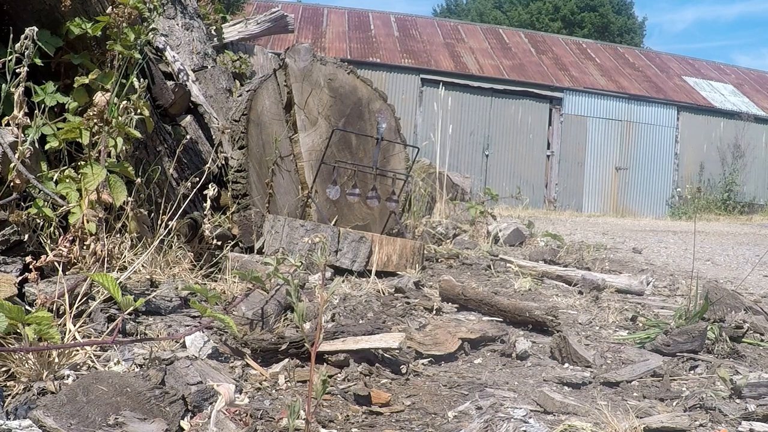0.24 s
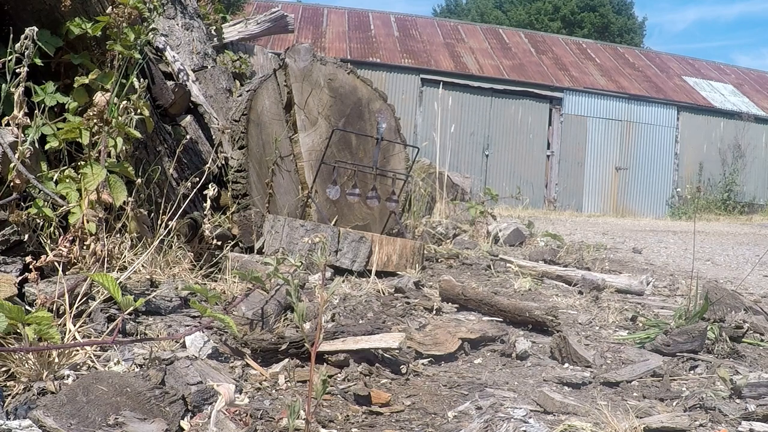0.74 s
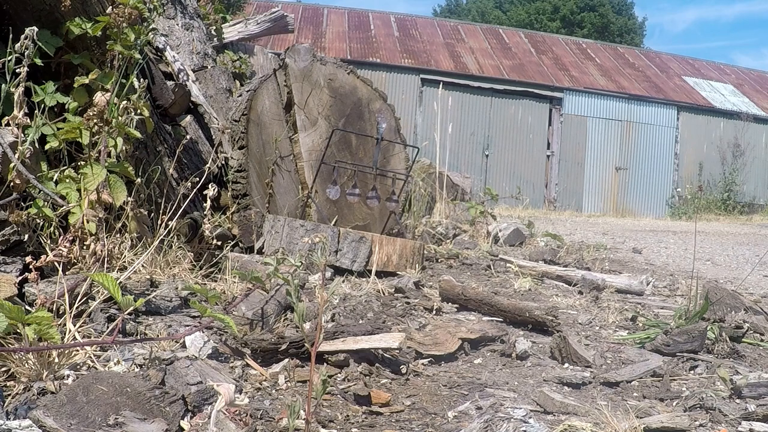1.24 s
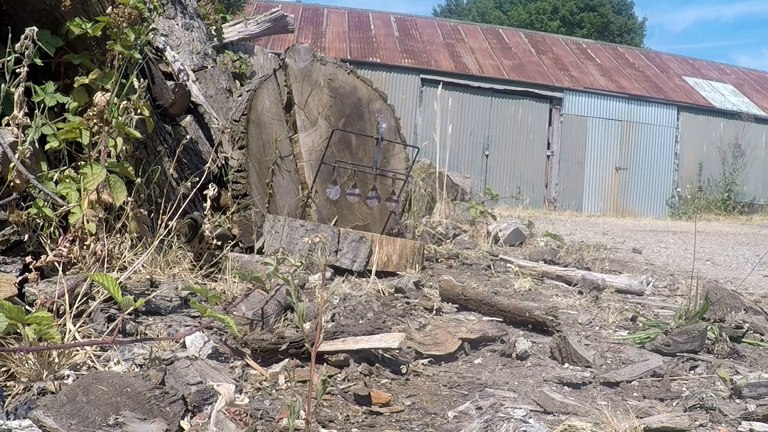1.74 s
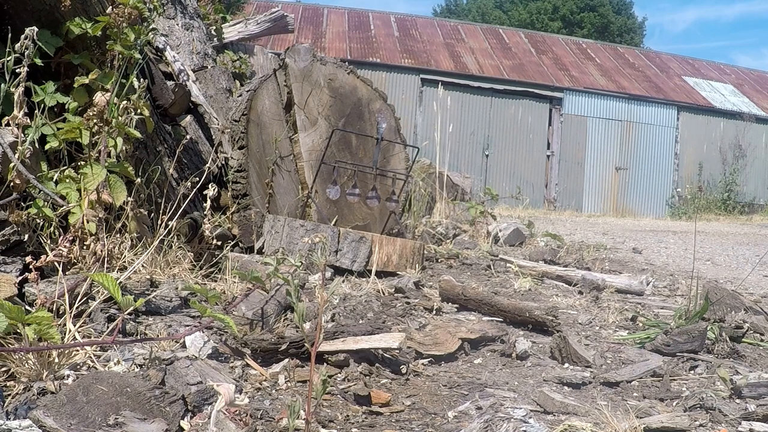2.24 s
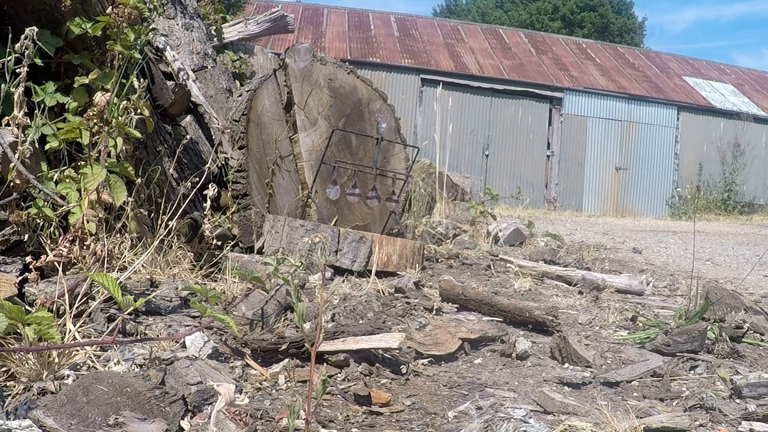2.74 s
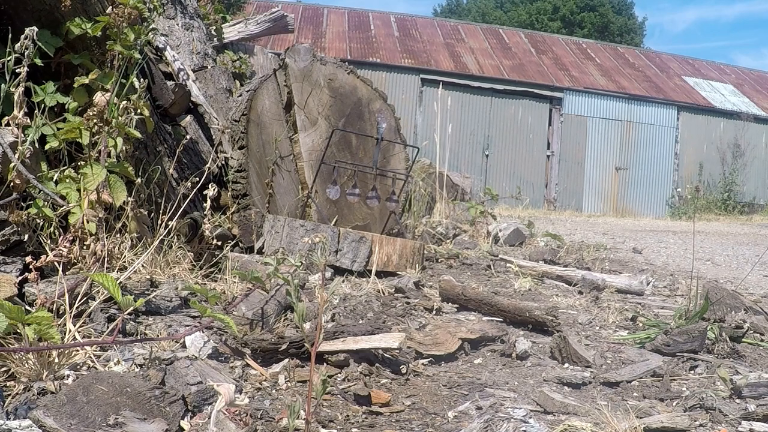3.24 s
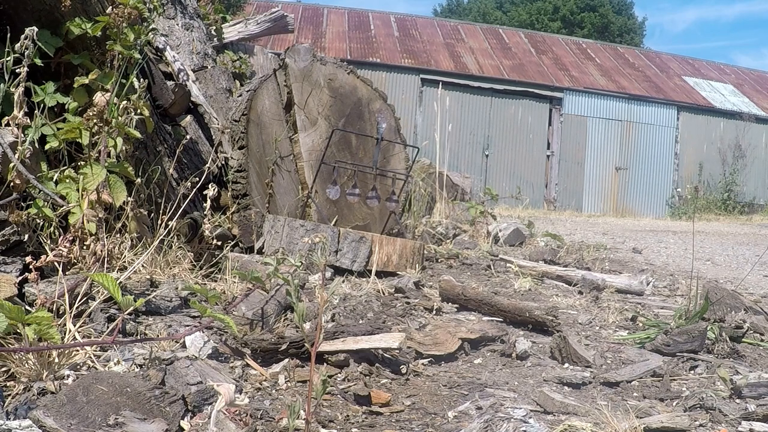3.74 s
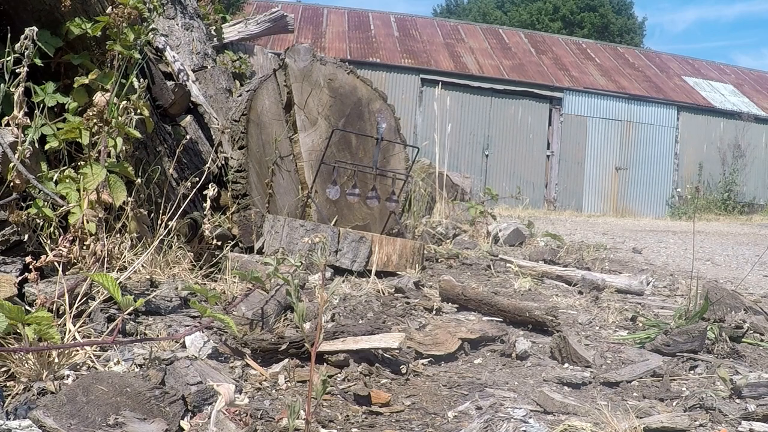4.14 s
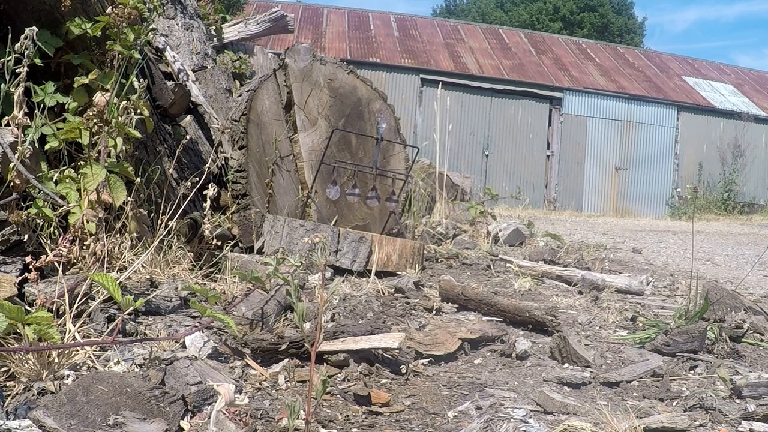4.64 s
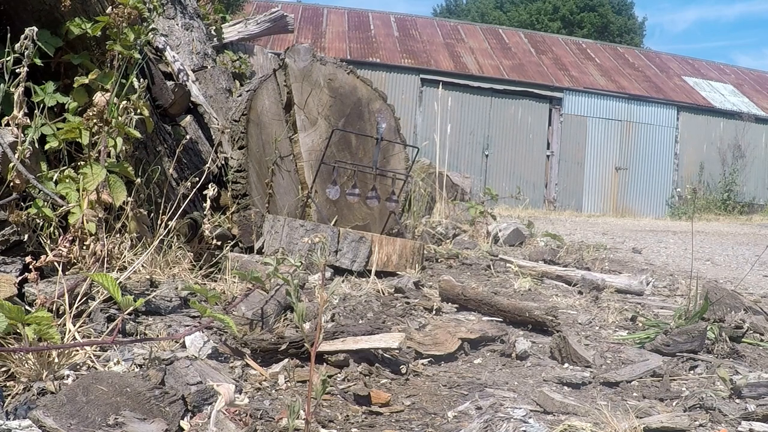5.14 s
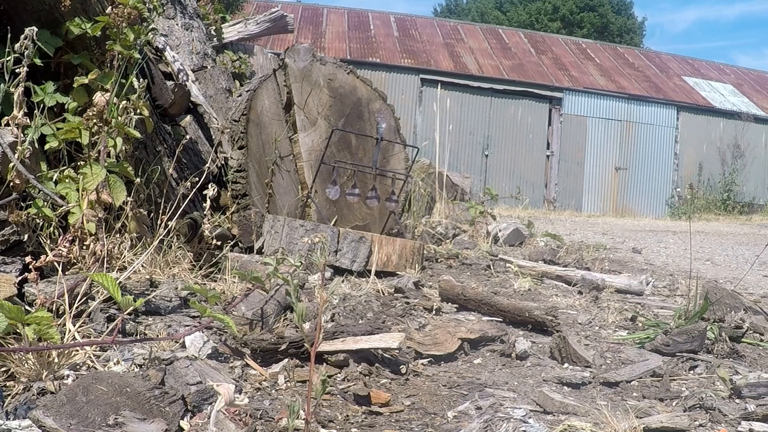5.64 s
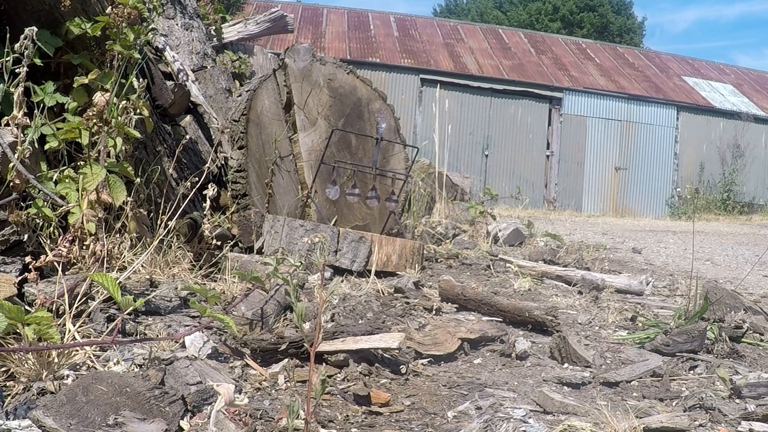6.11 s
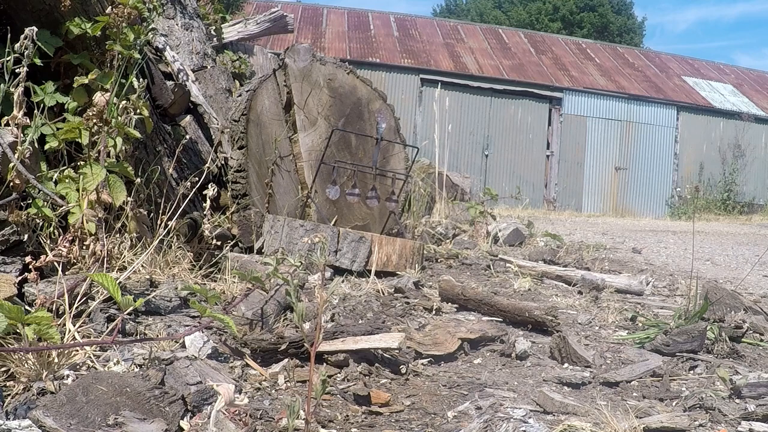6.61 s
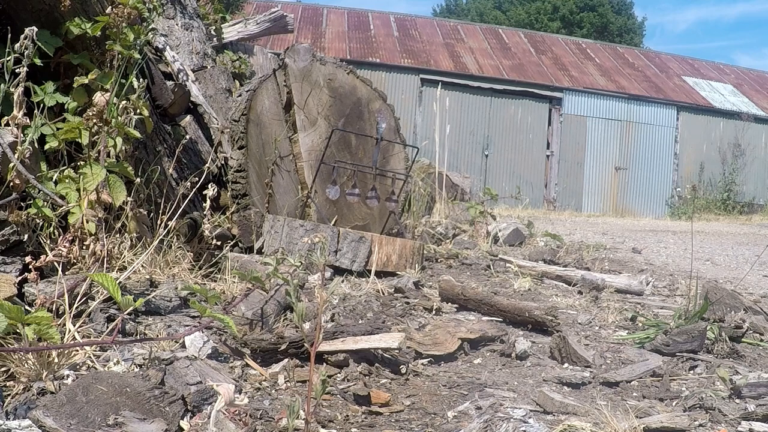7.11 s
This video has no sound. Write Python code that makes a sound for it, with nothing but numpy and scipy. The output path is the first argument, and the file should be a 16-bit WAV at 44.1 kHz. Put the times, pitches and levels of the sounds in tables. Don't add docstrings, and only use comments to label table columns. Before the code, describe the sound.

Outdoor farmyard with a wavering low aircraft drone, steady far machinery hum and faint hiss, then a click, pop and short metallic echo near the end.

```python
import sys
import numpy as np
from scipy import signal
from scipy.fft import rfft, irfft, next_fast_len
from scipy.io import wavfile
from scipy.ndimage import uniform_filter1d

SR = 44100
rng = np.random.default_rng(int(sys.argv[2]) if len(sys.argv) > 2 else 0)


def to_wav(sig):
    pcm = np.clip(np.atleast_2d(sig), -1, 1) * 32767
    pcm = np.round(pcm).astype(np.int16)
    wavfile.write(sys.argv[1], SR, pcm.T)


def elevation(decibels):
    levels = np.asarray(decibels, float)
    return 10 ** (levels / 20)


N = 325017
TIME = np.arange(N) / SR
BINS_HZ = np.fft.rfftfreq(N, 1 / SR)
SIDE = np.array([[1], [-1]])

# [f/Hz, level/(dB per Hz)]
AIR_DENSITY = [(8, -79), (45, -67.5), (160, -66.5), (300, -74.5), (420, -75.5), (560, -82), (1000, -81),
               (1350, -87), (1780, -90.5), (1950, -94.5), (2300, -97.5), (3200, -100), (4500, -108),
               (8000, -125)]
# [f/Hz, level/(dB per Hz)]
HISS_DENSITY = [(500, -105), (4600, -102), (5900, -99), (7850, -100), (7950, -103), (9000, -101),
                (10000, -102), (12500, -109), (15000, -118), (22000, -130)]
# [f/Hz, likeness/0-1, right lead/rad, left minus right/dB]
PORT_PAIR = [(20, .2, 0, -.8), (86, .88, 0, 1.4), (260, .76, .16, 2.6), (430, .33, .74, 1.0),
             (600, .15, 2.04, -.7), (800, .66, 2.76, -1.1), (1100, .56, 3.05, -2.8), (1500, .42, 3.7, -2.5),
             (2100, .3, 3.7, -.6), (2800, .12, 4.6, -.6), (3500, .65, 6.0, -1.5), (4400, .9, 6.25, -.2),
             (7500, .1, 6.3, -.3), (8600, .1, 6.3, -2.4)]
# [t/s, length/s, centre f/Hz, level/dB]
ROAR_GUSTS = [(2.0, 0.23, 300, 2), (2.96, 1, 300, 6.5), (4.2, 0.18, 200, 1), (4.6, 0.15, 300, -3),
              (5.3, 1, 130, -13), (5.873, 0.33, 280, 8), (5.95, 0.5, 420, 6.5), (6.3, 0.32, 220, 5),
              (1.75, .3, 140, 5), (7.3, .2, 140, 6), (6.213, 0.42, 298, 7.5), (6.522, 0.22, 400, 7),
              (7.043, 0.53, 300, 6), (2.806, 0.21, 1700, 6), (3.1, 0.33, 1800, 4), (3.6, 0.45, 815, 2),
              (4.103, 0.27, 1600, 8), (4.15, .4, 596, 7), (7.303, .2, 360, 5), (4.6, 0.36, 1660, 4),
              (5.905, 0.4, 1390, 6), (6.527, .28, 950, 8), (6.85, 0.47, 1650, 4.5), (7.3, 0.24, 1700, 5)]
GUST_OCTAVES, CALM_DB, NEARING_DB_PER_S = 0.68, -2.5, 0.2856
# [multiple of cycle rate, level/dB]
ENGINE_PARTIALS = [(2, -62), (5, -62), (6, -53), (8, -56), (9, -64), (11, -59), (12, -57.5), (15, -63),
                   (16, -55.5), (20, -61), (22, -62.5), (23, -66.5), (25, -71), (26, -70), (27, -65),
                   (28, -61.5), (29, -68), (31, -66.5)]
# [t/s, f/Hz]
ENGINE_RATE = [
    (0, 22.91),
    (2.5, 22.94),
    (4.5, 22.78),
    (7.37, 22.96),
]
# [f/Hz, level/dB]
MACHINE_HUMS = [
    (18.2, -54),
    (30.1, -51.5),
    (54.5, -60),
]
# [t/s, level/dB]
BREEZE_LEVEL = [
    (0, -10.5),
    (0.5, -1.5),
    (1.8, -4.5),
    (2.4, 1.5),
    (3.7, 0),
    (4.2, 3.5),
    (5.5, 1.5),
    (6.2, -1),
    (7.37, 0.5),
]
# [t/s, peak level/dB, left minus right/dB, centre f/Hz, t60/s]
SHOT_CRACKS = [(6.5974, -49, -3, 5800, .016), (6.599, -47, -1, 1900, 0.022),
               (6.6022, -48, -1.5, 6900, .026), (6.601, -46.5, -8, 5500, .035),
               (6.659, -40.5, 1, 6550, 0.0092), (6.6587, -41, -4, 2800, 0.01),
               (6.658, -53, -1, 9500, 0.007), (6.6757, -39.5, -16, 2450, 0.02),
               (6.6768, -42, 0, 4940, 0.018), (6.6835, -43, -4, 6000, 0.036),
               (6.6844, -53, -4, 4300, 0.017), (6.6945, -41.5, 3, 2320, 0.025),
               (6.698, -42, -3, 2480, 0.028), (6.7054, -47, -4, 3300, .03), (6.7102, -46, -3, 2300, .03),
               (6.717, -45, 1, 3100, 0.025)]
CRACK_T60_S, CRACK_WIDTH_HZ = 0.018, 1700
# [f/Hz, level/dB, t60/s]
PLATE_MODES = [
    (2440, -52.5, 0.25),
    (3410, -57.5, 0.25),
    (5300, -56, 0.2),
]
# [f/Hz, level/(dB per Hz)]
WALL_DENSITY = [(700, -52), (1500, -35), (2400, -34.5), (3600, -39), (4500, -46), (5800, -40.5),
                (7500, -47), (12000, -66)]
YARD_DB, YARD_T60_S = -46, 0.53
# [t/s, f/Hz]
BLADE_RATE = [
    (0, 95.6),
    (1.0, 94.4),
    (1.9, 92.8),
    (4.2, 90.6),
    (4.9, 90.4),
    (5.7, 88.7),
    (7.37, 87.2),
]
# [t/s, level/dB]
BLADE_LEVEL = [(0, -30), (0.6, -26), (1.0, -28), (1.38, -34), (1.6, -42.5), (1.78, -36.5), (1.88, -31),
               (2.6, -26.5), (3.1, -28), (3.6, -36.5), (3.87, -26), (4.65, -31), (4.96, -35), (5.06, -41),
               (5.66, -44), (5.8, -32.5), (6.15, -22.5), (7.37, -26.5)]
# [t/s, length/s, level/dB]
PATH_FADES = [(0.296, 0.17, -5.5), (0.892, 0.077, -3), (1.083, 0.087, -9), (1.27, .1, -4),
              (2.31, 0.13, -1.5), (2.85, 0.24, -7.5), (3.24, .1, -2), (3.692, .1, -9), (4.27, 0.1, -2),
              (4.788, .16, -10), (5.1, 0.056, -12), (5.303, .06, -7), (5.59, 0.082, -14), (6.622, 0.17, -5),
              (6.9, 0.058, -1.5), (7.043, .14, 2.5), (7.226, 0.15, -4.5)]
# [t/s, length/s, multiple, level/dB]
MULTIPLE_SWELLS = [(0.25, .35, 2, -54), (0.6, 0.25, 2, -42), (0.837, 0.25, 2, -43), (1.345, 0.26, 2, -37.5),
                   (1.705, 0.42, 2, -42), (2.195, 0.44, 2, -38), (2.662, 0.33, 2, -36),
                   (3.015, 0.41, 2, -35), (3.386, 0.15, 2, -45), (3.687, .08, 2, -42), (4.053, .2, 2, -40),
                   (4.4, 0.48, 2, -45), (5.2, 0.63, 2, -49), (5.74, .2, 2, -34.5), (5.96, .16, 2, -34.5),
                   (6.142, 0.13, 2, -34), (6.28, 0.041, 2, -33), (6.458, 0.2, 2, -36), (6.72, .08, 2, -39),
                   (7.1, 0.76, 2, -51), (0.681, 0.14, 3, -47.5), (1.348, 0.39, 3, -48), (2.6, 0.38, 3, -52),
                   (2.873, 0.26, 3, -47.5), (4.4, .7, 3, -56.5), (5.884, 0.19, 3, -42),
                   (6.123, 0.16, 3, -45), (6.447, 0.44, 3, -47), (7.073, 0.08, 3, -42.5),
                   (7.302, .2, 3, -46.5)]


def curve(table):
    rows = np.array(table, float)
    return np.interp(TIME, rows[:, 0], rows[:, 1])


def over_hz(table, column, hz):
    rows = np.array(table, float)
    return np.interp(np.log(np.maximum(hz, 1)), np.log(rows[:, 0]), rows[:, column])


def running_phase(rate_hz):
    return 2 * np.pi * np.cumsum(rate_hz) / SR


def walk(rate_hz):
    hold = int(SR / rate_hz)
    steps = np.repeat(rng.standard_normal(N // hold + 3), hold)
    smooth = uniform_filter1d(uniform_filter1d(steps, hold), hold)
    return 1.63 * smooth[hold:N + hold]


def bump(s, length_s, edge):
    return np.exp(-abs(2 * (TIME - s) / length_s) ** edge)


def decay(since_s, t60_s):
    return np.exp(-np.log(1000) * since_s / t60_s)


def coloured(density, channels):
    white = rfft(rng.standard_normal((channels, N)))
    return white * elevation(over_hz(density, 1, BINS_HZ)) * np.sqrt(SR / 2)


def ports(common, apart=None):
    margin = 4096
    size = next_fast_len(N + 2 * margin)
    pad = (margin, size - N - margin)
    hz = np.fft.rfftfreq(size, 1 / SR)
    like, lead_rad, balance_db = (over_hz(PORT_PAIR, column, hz) for column in range(1, 4))
    common = np.pad(common, pad, "reflect", reflect_type="odd")
    common = common * signal.windows.tukey(size, margin / size)
    pair = rfft(common) * np.exp(-.5j * lead_rad * SIDE)
    if apart is not None:
        alone = rfft(np.pad(apart, ((0, 0), pad), "reflect"))
        pair = np.sqrt(like) * pair + np.sqrt(1 - like) * alone
    return irfft(pair * elevation(balance_db * SIDE / 2), size)[:, margin:margin + N]


def gusts_db(hz):
    level_db = CALM_DB + NEARING_DB_PER_S * TIME
    for s, length_s, centre_hz, db in ROAR_GUSTS:
        reach = np.exp(-(np.log2(hz / centre_hz) / GUST_OCTAVES * 2) ** 2)
        if reach > .02:
            level_db = level_db + reach * db * bump(s, length_s, 1.16)
    return level_db


def outdoor_air():
    spectra, out, lumps = coloured(AIR_DENSITY, channels=3), 0, walk(40)
    lowest_hz = 9.1
    place = 2 * np.log2(np.maximum(BINS_HZ, 1) / lowest_hz)
    for k in range(20):
        hz = lowest_hz * 2 ** (k / 2)
        band = irfft(spectra * np.sqrt(np.clip(1 - abs(place - k), 0, 1)), N)
        reach = np.clip(min(hz / 60, 1700 / hz), 0, 1) ** 4
        gust_db = reach * gusts_db(hz)
        lump_db = 0.34 * np.maximum(gust_db, 0) * lumps
        out = out + band * elevation(gust_db + lump_db + 0.48 * walk(3.03) + 0.55 * walk(9))
    return ports(out[0], out[1:])


def engine():
    phase, breeze_db, out = running_phase(curve(ENGINE_RATE)), curve(BREEZE_LEVEL), 0
    for k, db in ENGINE_PARTIALS:
        share = np.interp(k, [6, 22], [0, 1])
        level_db = db + share * breeze_db + 1.17 * walk(2.98) + 1.7 * walk(12)
        out = out + elevation(level_db) * np.sin(k * phase + 0.61 * walk(3))
    for hz, db in MACHINE_HUMS:
        out = out + elevation(db + 1.1 * walk(2.34)) * np.sin(2 * np.pi * hz * TIME + 1.94 * walk(2.16))
    return np.sqrt(2) * out


def burst(hz, width_hz, t60_s, size):
    t = np.arange(size) / SR
    noise = rng.standard_normal((3, size))
    edges_hz = np.clip([hz - width_hz / 2, hz + width_hz / 2], 300, 14000)
    band = signal.butter(2, edges_hz, "bandpass", fs=SR, output="sos")
    out = signal.sosfilt(band, noise[0] + .5 * noise[1:])
    out = out * (1 - np.exp(-t / 0.00049)) * decay(t, t60_s)
    return out / abs(out).max()


def ring(modes, since_s):
    return sum(elevation(db) * np.sin(2 * np.pi * hz * since_s) * decay(since_s, t60_s)
               for hz, db, t60_s in modes)


def air_gun():
    out = np.zeros((2, N))
    for s, db, pan_db, hz, t60_s in SHOT_CRACKS:
        width_hz = min(CRACK_WIDTH_HZ * CRACK_T60_S / t60_s, 0.6 * hz)
        hit = burst(hz, width_hz, t60_s, size=2500)
        start = int(s * SR)
        out[:, start:start + hit.shape[1]] += elevation(db + SIDE * pan_db / 2) * hit
    since_s = np.maximum(TIME - 6.676, 0)
    swell = (1 - np.exp(-since_s / 0.012)) * decay(since_s, YARD_T60_S)
    walls = irfft(coloured(WALL_DENSITY, channels=3), N)
    walls = 0.66 * walls[0] + 0.63 * walls[1:]
    return out + elevation(-1.5 * SIDE) * (elevation(YARD_DB) * swell * walls + ring(PLATE_MODES, since_s))


def exhaust():
    turn = running_phase(curve(BLADE_RATE) / 3)
    swell_db, out = 2.12 * gusts_db(270), 0
    for k in range(4, 18):
        if k % 3 or k > 9:
            level_db = -60.5 - 1.3 * abs(k - 7) + swell_db + 3.6 * walk(18)
            out = out + elevation(level_db) * np.sin(k * turn + 1.17 * walk(12))
    return out


def propeller():
    phase = running_phase(curve(BLADE_RATE))
    fade_db = sum(db * bump(s, length_s, 2.6) for s, length_s, db in PATH_FADES)
    sizes = [elevation(curve(BLADE_LEVEL) + fade_db)]
    for k in (2, 3):
        swells = sum(elevation(db) * bump(s, length_s, 2.6)
                     for s, length_s, multiple, db in MULTIPLE_SWELLS if round(multiple) == k)
        sizes.append(elevation(-60.5) + swells)
    flutter_db, waver_rad, out = [0.64, 1.1, 3.0], [0.18, 0.26, 0.83], 0
    for k, size in enumerate(sizes):
        wave = np.sin((k + 1) * phase + waver_rad[k] * walk(12))
        out = out + np.sqrt(2) * size * elevation(flutter_db[k] * walk(14)) * wave
    return out


def scene():
    return outdoor_air() + air_gun() + ports(engine() + exhaust() + propeller())


def low_pass(x):
    return signal.sosfilt(signal.butter(12, 15080, fs=SR, output="sos"), x)


def record(dry):
    tilt_db = np.where((BINS_HZ > 7900) & (BINS_HZ < 11500), -1.2, -.1) * SIDE
    heard = dry + irfft(coloured(HISS_DENSITY, channels=2) * elevation(tilt_db), N)
    ease = np.sin(np.pi / 2 * np.clip((N / SR - TIME) / .004, 0, 1)) ** 2
    return low_pass(heard * ease)


dry = scene()
out = record(dry)
to_wav(out)
```